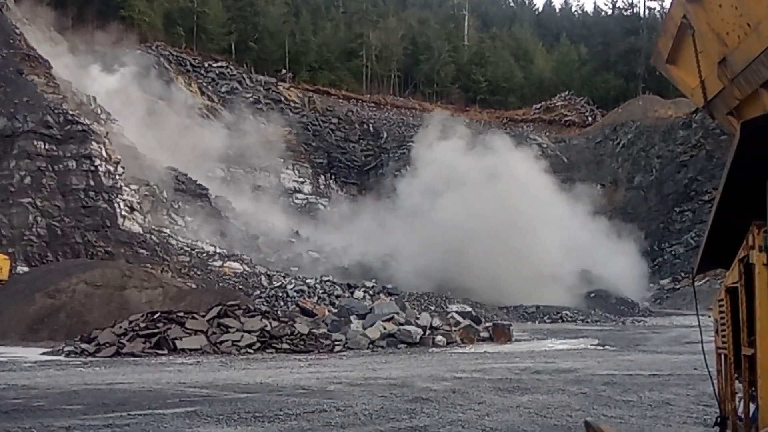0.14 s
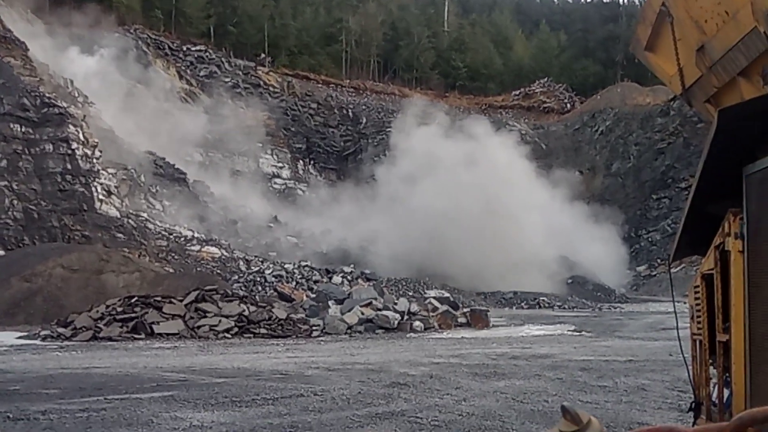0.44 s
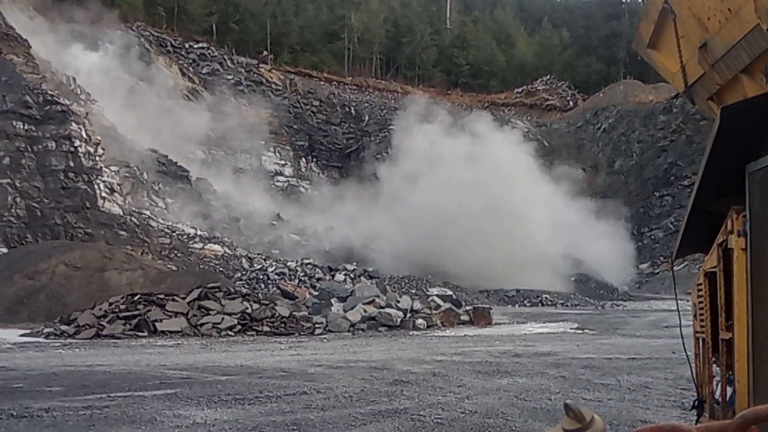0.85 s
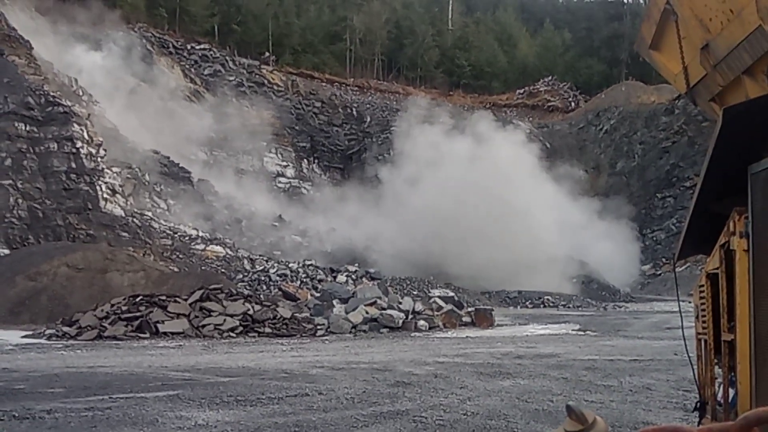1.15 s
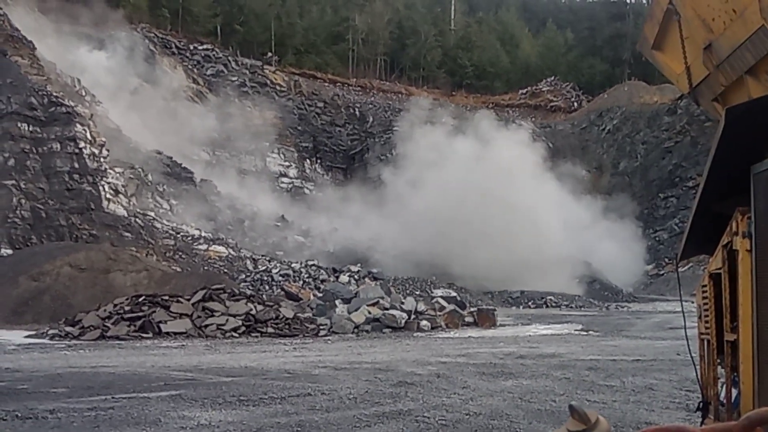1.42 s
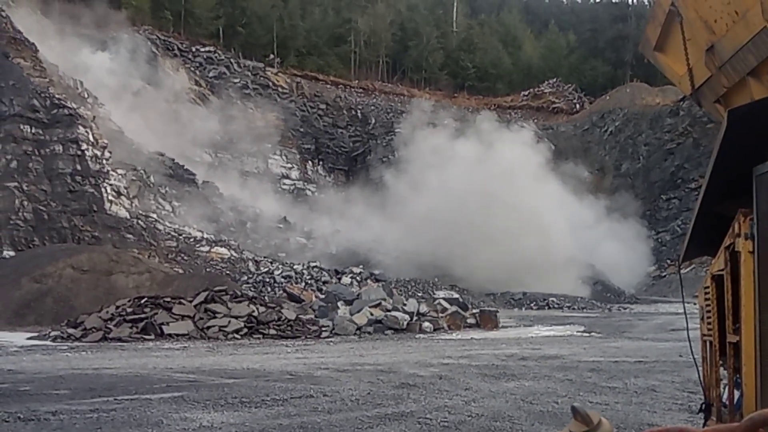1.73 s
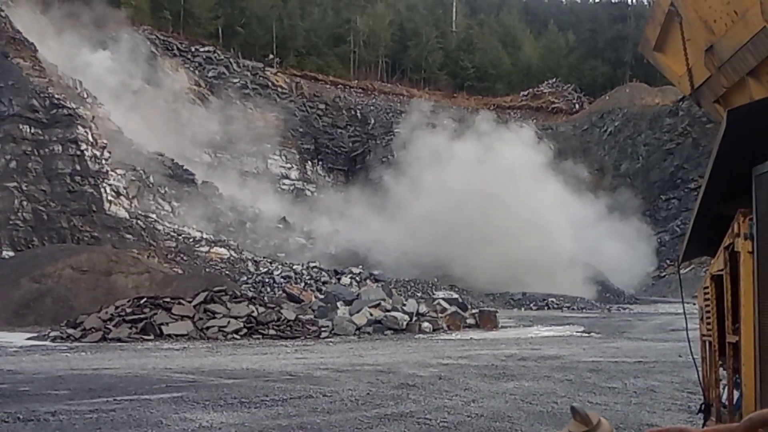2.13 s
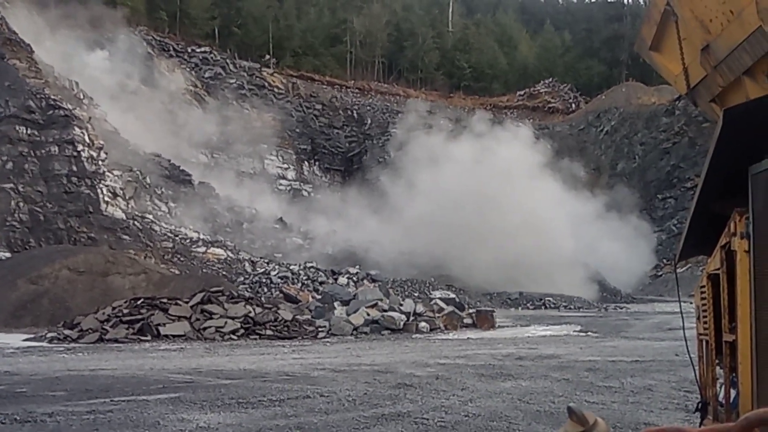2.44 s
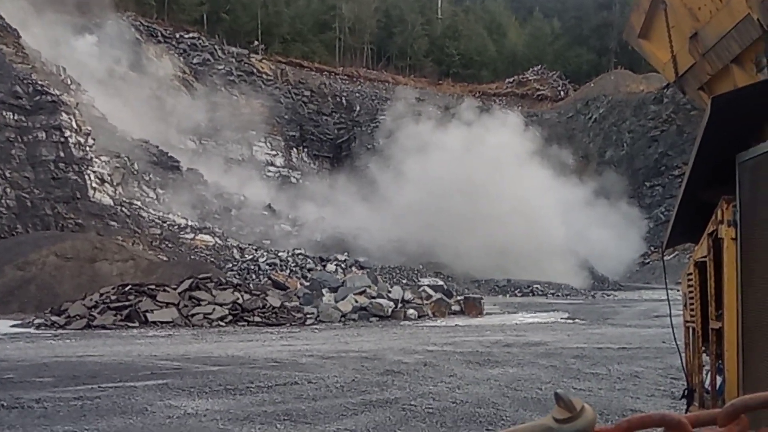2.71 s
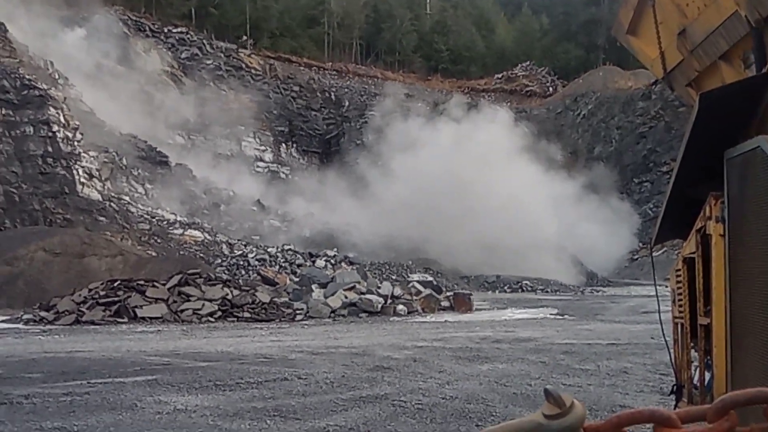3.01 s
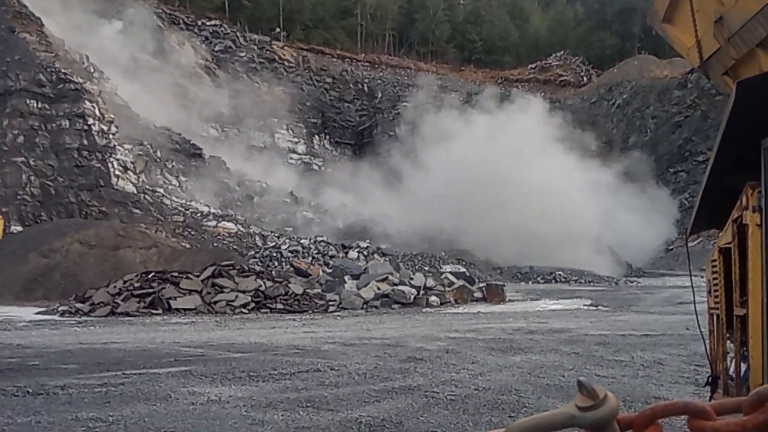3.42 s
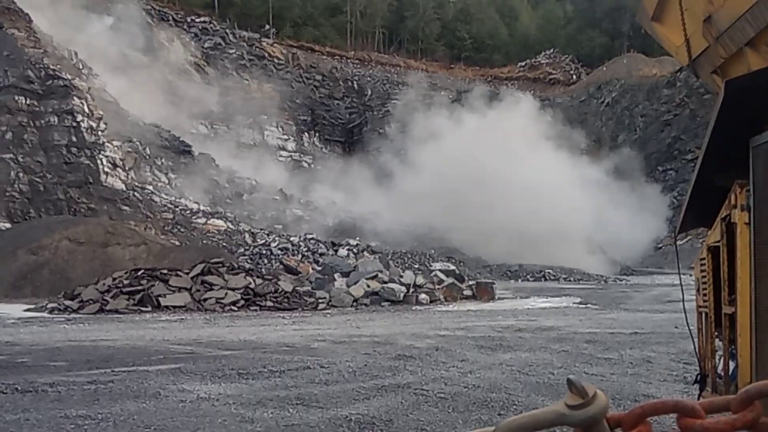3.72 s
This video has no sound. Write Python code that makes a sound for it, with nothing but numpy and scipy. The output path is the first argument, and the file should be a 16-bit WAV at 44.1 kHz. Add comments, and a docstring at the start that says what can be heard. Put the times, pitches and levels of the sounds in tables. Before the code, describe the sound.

Loose stone pours and tumbles in a quarry, dense knocks and cracks at first, then sparser clicks and small bursts over fading grit; a close tick on the phone late on. Right side bright, left shaded.

```python
"""A gritty rush of sliding stone settles on a distant quarry slope: patchy noise bands for grit, dust,
tumbling stones and rumble, the grit roughened by pebble spatter and cracking chips.
Boulders thud and slabs clack as short rings with noisy crunches; sharp clicks ring one bright phone port.
The right port is bright, ringing near 6 kHz; the left is shaded, dull and a little late.
Once something ticks on the phone's case."""
import sys
import numpy as np
from scipy import signal
from scipy.fft import rfft, irfft, next_fast_len
from scipy.io import wavfile
from scipy.ndimage import uniform_filter1d, map_coordinates

SR = 44100
rng = np.random.default_rng(int(sys.argv[2]) if len(sys.argv) > 2 else 0)


def waveform_to_disk(signal):
    """Save audio, clipped to [-1, 1], as 16-bit WAV at the path in sys.argv[1]."""
    frames = np.transpose(np.atleast_2d(signal))
    scaled = np.clip(frames, -1, 1) * 32767
    samples = np.round(scaled).astype(np.int16)
    wavfile.write(sys.argv[1], SR, samples)


N = 170226

# The slide's course, before random swells. Each row: start in seconds, base levels of grit, tumbling
# stones and rumble in dB.
SLIDE_LEVELS = [(0.0, -39, -49.5, -54), (0.56, -43, -50.5, -63.5), (0.83, -42.5, -52.5, -62),
                (1.01, -42.5, -54.5, -55.5), (1.18, -45.5, -53.5, -63), (1.38, -46, -55, -62.5),
                (1.5, -46.5, -60, -72), (1.63, -43.5, -53.5, -70.5), (1.91, -46, -53, -67),
                (2.04, -40.5, -50, -72), (2.18, -44.5, -61, -68), (2.46, -47, -56.5, -74),
                (2.64, -44, -68, -71.5), (2.74, -44.5, -58.5, -57), (2.85, -45, -59.5, -69),
                (2.9, -41, -58.5, -51.5), (3.08, -46, -58.5, -68), (3.23, -47.5, -70, -74),
                (3.4, -49.5, -61.5, -72), (3.69, -48, -67.5, -66), (3.86, -48, -57, -66)]
# Noise colours of the slide's layers. Each row: frequency in Hz, relative level in dB.
GRIT_COLOUR = [(1470, -29.5), (2500, -22.5), (4790, -11.5), (5610, 0), (5970, 2.5), (6450, -2.5),
               (7250, -15.5), (8500, -27), (11000, -64), (18700, -120)]
STONES_COLOUR = [(290, -43), (500, -9), (821, -8), (994, 4.5), (1280, 1.5), (1910, 2), (2350, -2),
                 (4000, -1), (5200, -33), (8800, -120)]
RUMBLE_COLOUR = [(15, -44), (25, -19), (97, -2), (217, 3.5), (364, -6), (487, 0), (700, -6.5), (910, -10),
                 (1540, -120)]
DUST_COLOUR = [(4710, -52), (8000, -8.5), (8990, -11.5), (10700, -3.5), (12000, -16.5), (13100, -4.5),
               (14500, 3.5), (15800, -7)]
# Boulders. Each row: start in seconds, nominal peak in dB, pitch in Hz, t60 of the crunch in seconds,
# weight of the ground's boom in dB.
BOULDER_THUDS = [(0.027, -28.5, 214.5, 0.18, 2.5), (0.036, -31.5, 105, 0.15, -7),
                 (0.1, -37.5, 136, 0.27, -5), (0.239, -45.5, 205, 0.31, -3.5),
                 (0.397, -29.5, 202, 0.16, -14), (0.409, -25.5, 223, 0.12, -17),
                 (0.445, -30.5, 193, 0.17, -8), (0.768, -37.5, 142.3, 0.27, 0),
                 (0.804, -31, 198, 0.14, -10), (0.788, -30, 229, 0.17, -16), (0.832, -36, 200, 0.24, -13),
                 (0.946, -42.5, 223, 0.22, -6), (1.092, -43.5, 150, 0.25, -5), (1.124, -38, 160, 0.19, -5),
                 (1.268, -34, 246, 0.13, -17), (1.649, -48.5, 428, 0.15, -3), (1.867, -41, 229, 0.24, -24),
                 (1.886, -38, 225, 0.39, -12), (1.945, -40.5, 193.5, 0.38, -18),
                 (2.046, -40, 225, 0.23, -11), (2.074, -43, 230, 0.14, -5), (2.095, -44, 171.5, 0.33, -5),
                 (2.408, -48.5, 228.3, 0.33, -6.5), (2.68, -41, 326, 0.071, -10),
                 (2.707, -35.5, 166, 0.16, -12), (2.724, -35, 235, 0.24, -0.5), (2.744, -37, 225, 0.17, -4),
                 (2.809, -38, 128, 0.15, -8), (2.873, -37, 420, 0.14, -17), (2.899, -37, 249, 0.16, -16),
                 (2.925, -45.5, 430, 0.29, -8), (2.954, -45, 227, 0.25, -5), (3, -40, 376, 0.15, -9),
                 (3.021, -43, 457, 0.092, -18), (3.468, -39.5, 325, 0.2, -5), (3.489, -39.5, 137, 0.18, -1),
                 (3.51, -41.5, 163, 0.15, -6), (3.539, -53.5, 133, 0.19, -3),
                 (3.794, -36, 331.5, 0.11, -32), (3.847, -44.5, 358, 0.18, -18),
                 (0.597, -36, 610, 0.09, -22), (0.802, -22, 520.5, 0.067, -25),
                 (1.214, -41.5, 504, 0.16, -25), (1.289, -43.5, 517, 0.16, -25),
                 (1.951, -36, 505, 0.15, -25), (2.049, -34.5, 504, 0.12, -27), (2.414, -40, 488, 0.12, -22),
                 (3.474, -32, 502, 0.09, -25), (3.652, -49, 410, 0.1, -25), (3.671, -41.5, 67.3, 0.15, -9)]
# Slabs. Each row: start in seconds, nominal peak in dB, pitch in Hz, t60 of the crunch in seconds,
# weight of the pile's hollow answer in dB.
SLAB_CLACKS = [(0.015, -37, 2920, 0.18, -9), (0.029, -31.5, 1410, 0.13, 1), (0.071, -32, 3800, 0.18, -6),
               (0.155, -41.5, 3920, 0.25, -4), (0.304, -48, 1970, 0.061, 12.5),
               (0.39, -42.5, 938, 0.39, -4), (0.401, -32, 1210, 0.15, 0.5), (0.54, -36, 3940, 0.081, -12),
               (0.573, -23, 3480, 0.11, -11), (0.599, -26.5, 2800, 0.088, -4), (0.662, -45, 847, 0.39, 3.5),
               (0.697, -36.5, 4110, 0.14, -3), (0.787, -33, 887, 0.052, 3), (0.803, -32.5, 880, 0.12, 1.5),
               (0.855, -42, 1040, 0.18, 3.5), (0.883, -34, 3370, 0.13, -5), (0.893, -34, 2320, 0.19, 3),
               (0.9115, -23.5, 2370, 0.07, -4), (0.914, -28.5, 997, 0.11, -6),
               (1.023, -36, 3830, 0.055, -6), (1.037, -41, 3440, 0.082, -22),
               (1.058, -26.5, 3660, 0.04, -24), (1.116, -44.5, 820, 0.11, 0), (1.21, -45, 996, 0.34, -3),
               (1.274, -41.5, 3450, 0.38, 2), (1.422, -40, 3450, 0.1, -16), (1.582, -35, 3800, 0.11, -10.5),
               (1.654, -37.5, 1010, 0.12, -2), (1.654, -32.5, 1920, 0.083, -24), (1.77, -45, 2700, 0.1, -6),
               (1.9465, -28, 2900, 0.12, -3.5), (2.014, -35.5, 1990, 0.12, -6.5),
               (2.053, -37, 2720, 0.15, 0.5), (2.223, -50, 3300, 0.17, -2.5),
               (2.256, -39.5, 2700, 0.18, -16), (2.415, -29.5, 1530, 0.076, -9),
               (2.531, -38.5, 2120, 0.079, -32), (2.548, -38.5, 1907, 0.2, -40),
               (2.572, -40, 2100, 0.095, -30), (2.6, -43, 3380, 0.18, -30), (2.718, -41, 2435, 0.18, 0),
               (2.806, -41, 3200, 0.15, 2), (2.926, -47.5, 766, 0.11, 8), (3.021, -52, 3800, 0.098, 2),
               (3.075, -48, 3680, 0.29, -5.5), (3.099, -46.5, 3750, 0.16, 2), (3.292, -43, 1050, 0.25, -19),
               (3.474, -45.5, 2050, 0.19, 2), (3.786, -37, 3940, 0.045, -8), (0.1092, -25, 4680, 0.12, -14),
               (0.5761, -38, 4680, 0.11, -21), (0.8016, -30.5, 4700, 0.091, -25),
               (0.9444, -41, 4580, 0.1, -25), (0.5731, -26, 1870, 0.12, -10),
               (0.5945, -22.5, 1870, 0.08, -8), (1.9544, -24, 2056, 0.11, -11),
               (1.9694, -31.5, 2040, 0.1, -8), (2.0677, -37.5, 1790, 0.11, -14),
               (2.0874, -36, 1860, 0.083, -11)]
# Chips. Each row: start in seconds, level in dB before the layer trims, t60 in seconds,
# weight of the lower ring in dB.
CHIP_CRACKS = [(0.0278, -25, 0.066, -9), (0.0702, -27.5, 0.19, -10), (0.1056, -26.5, 0.06, -8),
               (0.266, -30.5, 0.25, -11), (0.3217, -27.5, 0.058, -15), (0.399, -28.5, 0.061, -1.5),
               (0.4529, -37.5, 0.19, -2), (0.498, -28, 0.24, -18), (0.5252, -29, 0.081, -14),
               (0.578, -26.5, 0.12, -0.5), (0.6155, -26.5, 0.043, -10), (0.664, -22, 0.058, -22),
               (0.7527, -33, 0.36, -19), (0.8415, -44, 0.08, -12), (0.8724, -32.5, 0.13, -8),
               (0.9367, -33, 0.12, -5), (0.958, -28.5, 0.15, -13), (1.035, -30.5, 0.26, -16),
               (1.132, -29.5, 0.16, -8.5), (1.2121, -33.5, 0.19, -13), (1.257, -30, 0.08, -16),
               (1.273, -29.5, 0.26, -14), (1.363, -27, 0.12, -31), (1.4103, -36, 0.099, -19),
               (1.4298, -26.5, 0.074, -14), (1.5135, -38, 0.087, -10), (1.5264, -32, 0.088, -14),
               (1.5532, -29.5, 0.41, -19), (1.6332, -45, 0.065, -14), (1.6496, -33, 0.12, -16),
               (1.6953, -26, 0.056, -28), (1.7499, -46, 0.071, -16), (1.7754, -32.5, 0.17, -20),
               (1.8317, -33.5, 0.08, -10), (1.8811, -34, 0.045, -10), (1.9535, -24.5, 0.05, -9),
               (1.944, -19, 0.13, -6), (2.0168, -27, 0.11, -3.5), (2.054, -25, 0.33, -11),
               (2.1066, -22, 0.047, -18), (2.128, -27, 0.039, -24), (2.145, -34, 0.039, -19),
               (2.191, -30, 0.036, -19), (2.221, -34, 0.08, -11), (2.2395, -32, 0.27, -12),
               (2.2804, -31.5, 0.14, -15), (2.3675, -36.5, 0.065, -5), (2.4053, -30.5, 0.16, -16),
               (2.476, -32, 0.04, -12), (2.53, -34, 0.066, -6), (2.5641, -36, 0.058, -3),
               (2.601, -31, 0.093, -9), (2.702, -35, 0.3, -7.5), (2.8544, -37, 0.064, -15),
               (2.907, -27, 0.078, -31), (2.961, -26.5, 0.038, -27), (3.0067, -27, 0.058, -21),
               (3.0714, -35, 0.072, -18), (3.0996, -28, 0.058, -21), (3.1304, -33.5, 0.06, -12),
               (3.1672, -41, 0.072, -6), (3.2151, -40, 0.07, -12), (3.2201, -34, 0.078, -14),
               (3.4136, -35, 0.073, -26), (3.4195, -35.5, 0.18, -23), (3.459, -36.5, 0.17, -11),
               (3.495, -30, 0.054, -17), (3.513, -30, 0.13, -29), (3.611, -35.5, 0.15, -26),
               (3.8055, -33.5, 0.047, -12)]
# Single sharp clicks. Each row: start in seconds, peak in dB ahead of the ports' colour.
SHARP_SNAPS = [(0.6645, -22), (1.2118, -39), (1.276, -36), (1.3643, -28), (1.4098, -25), (1.5537, -22),
               (1.9444, -20), (2.0527, -27), (2.0645, -25), (2.0684, -22), (2.1283, -23), (2.145, -22),
               (2.1925, -34), (2.222, -35), (2.497, -28), (2.6017, -24.5), (2.9064, -10.5), (2.926, -19.5),
               (2.9613, -31), (3.0996, -39), (3.3608, -39), (3.422, -26.5), (3.461, -35), (3.496, -30.5),
               (3.8486, -27.5)]
# The tick on the case. Each row: start in seconds, level in dB before its lean, t60 in seconds.
CASE_TICK = [(2.8065, -13.5, 0.0073)]
# Noise colour of the tick. Each row: frequency in Hz, relative level in dB.
CASE_TICK_COLOUR = [(250, -14), (500, -1.5), (2600, -19), (4600, -3), (6600, -4.5), (8000, -7.5),
                    (8900, -10), (10500, -29), (16000, -37)]
# Lean of the tick, left over right. Each row: frequency in Hz, difference in dB.
CASE_TICK_LEAN = [(300, 15.5), (2400, 6), (4600, 16), (6000, -3), (9000, 14.5), (15000, 3)]
# Resonances of the ground, the stone pile and the chips. Each row: centre in Hz, width in Hz,
# relative level in dB.
GROUND_MODES = [(68.4, 31, -3.5), (100.2, 44, 5)]
PILE_MODES = [(513, 73, -0.5), (710.5, 190, -6), (989, 165, -1.5), (1288, 520, -2)]
CHIP_MODES = [(3480, 1030, -2.5), (4654, 184, 2.5)]
# Ring of the bright port. Each row: frequency in Hz, relative level in dB.
PORT_RING = [(4800, -19), (6000, 6.5), (6700, -3.5), (8800, -19), (14600, -13)]
# Shading of the left port over the right. Each row: frequency in Hz, gain in dB.
LEFT_SHADE = [(60, -3.5), (83, -1), (110, 4.5), (160, -1), (220, 1.5), (300, 0.5), (420, 0.5), (580, 2.5),
              (810, 0), (1120, 2), (1540, 5.5), (2140, 0.5), (2960, -13), (4090, -14.0), (5660, -24.5),
              (7830, -19.5), (10800, -20.5), (15000, -26)]
# Colour of the right port, which the left shares. Each row: frequency in Hz, gain in dB.
PORT_COLOUR = [(60, -2.5), (800, 0.95), (1500, -1.5), (3000, 6), (6000, 3.5), (15000, -7.5)]
# Likeness of the two ports. Each row: frequency in Hz, share from 0 to 1.
PORT_LIKENESS = [(60, 0.85), (500, 0.7), (1200, 0.5), (2500, 0.2), (5000, 0.55), (12000, 0.16)]

THUD_Q, CLACK_Q = 3.2, 3.4
THUD_RISE_S, CLACK_RISE_S, CRACK_RISE_S, TICK_RISE_S = 0.0024, 0.00077, 0.00078, 0.00077
PEBBLES_PER_S, PEBBLE_T60_S = 160, 0.02
PEBBLE_FLOOR_DB, PEBBLE_SPREAD_DB = -5, 2.5  # softest pebble, mean rise above it
DUST_DB, DUST_FOLLOWS = -10, 0.53  # against the grit; share of the grit's bursts
LAG_S, LAG_FROM_HZ = 0.000439, 984  # the bass reaches both ports together
SNAP_PEAK_S = 0.00045
TOP_HZ = 15800


def amp(db):
    """Decibels to amplitude."""
    return 10 ** (np.asarray(db) / 20)


def unit(x):
    """x scaled to rms 1."""
    return x / np.sqrt(np.mean(x ** 2) + 1e-20)


def along(points, hz):
    """A curve through (Hz, value) points on a log frequency axis."""
    f, v = np.transpose(points)
    return np.interp(np.log(hz + 1), np.log(f + 1), v)


def wobble(rate):
    """A smooth random curve with `rate` knots a second."""
    knots = rng.standard_normal(int(N * rate / SR) + 4)
    return map_coordinates(knots, [np.arange(N) * rate / SR])


def filtered(x, response):
    """x shaped by a complex response of frequency."""
    n = x.shape[-1]
    m = next_fast_len(n + 4096)
    return irfft(rfft(x, m) * response(np.fft.rfftfreq(m, 1 / SR)), m)[..., :n]


def rings(modes):
    """Causal response of (Hz, width, dB) resonances, with alternating signs."""
    def response(f):
        total = 0
        for k, (centre, width, db) in enumerate(modes):
            band = 1j * f * width
            total = total + (-1) ** k * amp(db) * band / (centre * centre - f * f + band)
        return total
    return response


def rush(colour, patchy_db):
    """Two unrelated coloured noises of overall rms 1, sharing patches of random gain in time and pitch."""
    cells = signal.stft(rng.standard_normal((2, N)), nperseg=256)[2]
    patches = rng.standard_normal(cells.shape[1:])
    patches = uniform_filter1d(patches, size=4, axis=0)
    patches = uniform_filter1d(patches, size=8, axis=1)
    pair = signal.istft(cells * amp(patchy_db * unit(patches)), nperseg=256)[1][:, :N]
    return unit(filtered(pair, lambda hz: amp(along(colour, hz))))


def strike(t, rise_s, t60):
    """A quick rise and an exponential fall."""
    return (1 - np.exp(-t / rise_s)) * amp(-60 * t / np.clip(t60, 0.004, 0.6))


def strikes(rows, rise_s):
    """Envelope of all (s, dB, t60) impacts, summed in power."""
    power, t = np.zeros(N + SR), np.arange(SR // 3) / SR
    for s, db, t60 in rows:
        power[round(s * SR):][:len(t)] += (amp(db) * strike(t, rise_s, t60)) ** 2
    return np.sqrt(power[:N])


def tick():
    """A tick on the case reaches both ports through the body: a noise burst leaning left or right by pitch."""
    halves = np.array([[0.5], [-0.5]])
    burst = strikes(CASE_TICK, TICK_RISE_S) * rush(CASE_TICK_COLOUR, patchy_db=3)
    return filtered(burst, lambda hz: amp(along(CASE_TICK_LEAN, hz) * halves))


def snaps():
    """Clicks too short to have a tail of their own ring the bright port."""
    clicks, t = np.zeros(N), np.arange(SR // 100) / SR
    for s, db in SHARP_SNAPS:
        clicks[round(s * SR)] = amp(db)
    swell = (t / SNAP_PEAK_S * np.exp(1 - t / SNAP_PEAK_S)) ** 1.2
    ring = swell * sum(amp(db) * np.cos(2 * np.pi * hz * (t - SNAP_PEAK_S)) for hz, db in PORT_RING)
    click_ring = signal.fftconvolve(clicks, ring / np.abs(ring).max())[:N]
    return click_ring * np.ones((2, 1))


def knocks(rows, under, q, rise_s, broad, clear, brief, rough_db, crest_db):
    """Each impact gives a brief clear ring at its pitch, then a longer crunch there and in what lies under it."""
    out, t = np.zeros((2, N + SR)), np.arange(SR // 3) / SR
    rough = amp(rough_db * np.pad(wobble(120), (0, SR)))

    def noise(colour):
        return unit(filtered(rng.standard_normal((2, len(t))), colour))

    def detuned_tones():
        """Sines near the modes underneath, each strike slightly off in pitch and level."""
        total = 0
        for hz, _, db in under:
            level = amp(db + rng.normal(0, 3.6))
            total = total + level * np.sin(2 * np.pi * hz * rng.normal(1, 0.0407) * t)
        return total

    for s, db, pitch_hz, t60, under_db in rows:
        own = rings([(pitch_hz, pitch_hz / q, 0)])
        shape = strike(t, rise_s, t60)

        def even(x):
            """x under the strike's envelope, with the envelope's own energy."""
            shaped = x * shape
            return shaped * np.linalg.norm(shape) / np.linalg.norm(shaped, axis=1, keepdims=True)

        blow = clear * strike(t, rise_s, brief * t60) * np.sin(2 * np.pi * pitch_hz * t)
        crunch = even(noise(lambda f: own(f) * (own(f) + broad)))
        answer = amp(under_db) * even(0.77 * unit(detuned_tones()) + noise(rings(under)))
        at = round(s * SR)
        grain = rough[at:][:len(t)]
        out[:, at:][:, :len(t)] += amp(db - crest_db) * (blow + grain * (crunch + answer))
    return out[:, :N]


def thuds():
    """Boulders land with a low ring and crunch, and the ground booms under them."""
    return knocks(BOULDER_THUDS, GROUND_MODES, THUD_Q, THUD_RISE_S,
                  broad=1.0, clear=1.67, brief=0.59, rough_db=1.7, crest_db=10.0)


def clacks():
    """Slabs knock with a higher ring and crunch, and the pile answers hollowly."""
    return knocks(SLAB_CLACKS, PILE_MODES, CLACK_Q, CLACK_RISE_S,
                  broad=0.61, clear=2.06, brief=0.25, rough_db=2.5, crest_db=10.5)


def rumble(level_db):
    """The slide's low end: patchy bass noise that swells slowly."""
    return amp(level_db + 0.63 * wobble(11)) * rush(RUMBLE_COLOUR, patchy_db=2.0)


def tumbling_stones(level_db, surge, spatter):
    """Midrange noise that swells with the slide and roughens with the pebbles."""
    level = amp(level_db + surge + 3.2 * wobble(45)) * np.sqrt(0.6 + 0.5 * spatter)
    return level * rush(STONES_COLOUR, patchy_db=3)


def dust(grit_db, bright):
    """A fine top-end hiss that partly follows the grit's bursts."""
    bursts = (bright / amp(grit_db)) ** DUST_FOLLOWS
    return amp(DUST_DB + grit_db + 1.6 * wobble(27.87)) * bursts * rush(DUST_COLOUR, patchy_db=2.0)


def pebble_spatter():
    """Power envelope of pebbles landing at random, many soft and few hard."""
    draw = rng.random((int(PEBBLES_PER_S * N / SR), 2))
    when = (draw[:, 0] * N).astype(int)
    level_db = PEBBLE_FLOOR_DB - PEBBLE_SPREAD_DB * np.log(draw[:, 1])
    hits = np.bincount(when, amp(2 * level_db), N)  # doubled dB gives power
    decay = strike(np.arange(SR // 10) / SR, 0.001, PEBBLE_T60_S) ** 2
    return np.abs(signal.fftconvolve(hits, decay)[:N])


def chip_ringing(jag):
    """The lower ring of cracking chips: noise through their resonances twice."""
    rows = [(s, db + ring_db, t60) for s, db, t60, ring_db in CHIP_CRACKS]
    ringing = unit(filtered(rng.standard_normal((2, N)), lambda f: rings(CHIP_MODES)(f) ** 2))
    return amp(-7.5) * jag * strikes(rows, CRACK_RISE_S) * ringing


def slide():
    """Sliding stone: grit with pebbles and cracking chips, over dust, tumbling stones and rumble."""
    s, *columns = np.transpose(SLIDE_LEVELS)
    grit_db, stones_db, rumble_db = [np.interp(np.arange(N) / SR, s, c) for c in columns]
    spatter = pebble_spatter()
    surge = wobble(9)  # shared by grit and stones, in dB
    jag = amp(0.89 * wobble(300))  # rapid raggedness of the cracks
    bed = amp(grit_db + 0.59 * surge + 1.4 * wobble(150)) * np.sqrt(0.73 + spatter)
    chips = amp(-6.5) * jag * strikes([row[:3] for row in CHIP_CRACKS], CRACK_RISE_S)
    bright = np.hypot(bed, chips)
    grit = bright * rush(GRIT_COLOUR, patchy_db=2.0)
    return (grit + chip_ringing(jag) + dust(grit_db, bright)
            + tumbling_stones(stones_db, surge, spatter) + rumble(rumble_db))


def ports(pair):
    """The right port hears the sound directly; the left hears it shaded, late and partly scattered."""
    def left_response(hz):
        alike = np.clip(along(PORT_LIKENESS, hz), 0, 1)
        lag_s = LAG_S * hz ** 6 / (hz ** 6 + LAG_FROM_HZ ** 6)
        late = np.exp(-2j * np.pi * hz * lag_s)
        shares = np.array([alike, np.sqrt(1 - alike ** 2)])  # direct, scattered
        return amp(along(LEFT_SHADE, hz)) * late * shares

    left = filtered(pair, left_response).sum(0)
    both = np.array([left, pair[0]])
    return filtered(both, lambda hz: amp(along(PORT_COLOUR, hz)))


def scene():
    """The slope is heard through the ports; the tick comes through the case."""
    slope = slide() + thuds() + clacks() + snaps()
    return ports(slope) + tick()


def record(dry):
    """The phone keeps nothing above its band limit."""
    return filtered(dry, lambda hz: hz < TOP_HZ)


dry = scene()
out = record(dry)
waveform_to_disk(out)
```